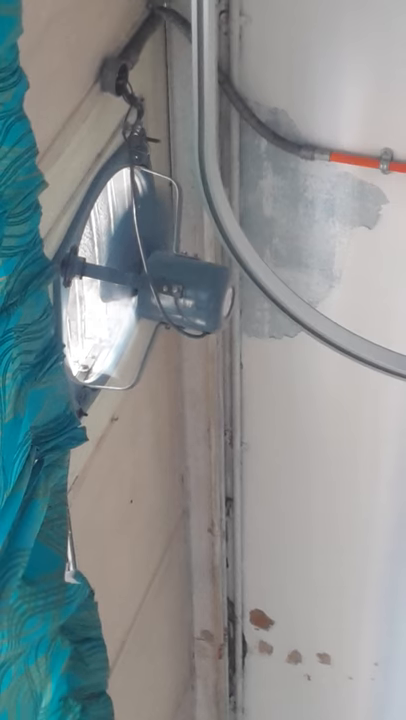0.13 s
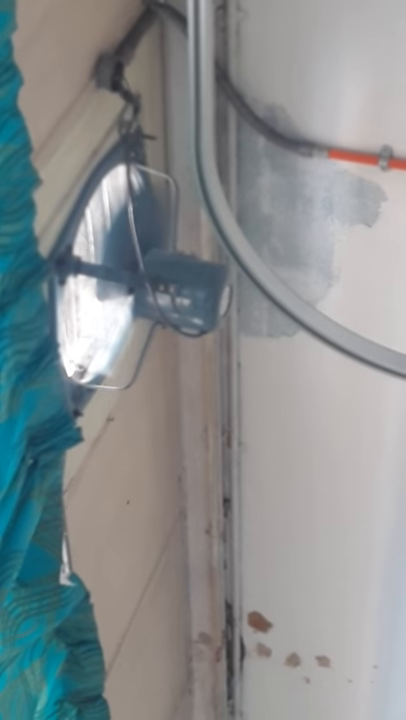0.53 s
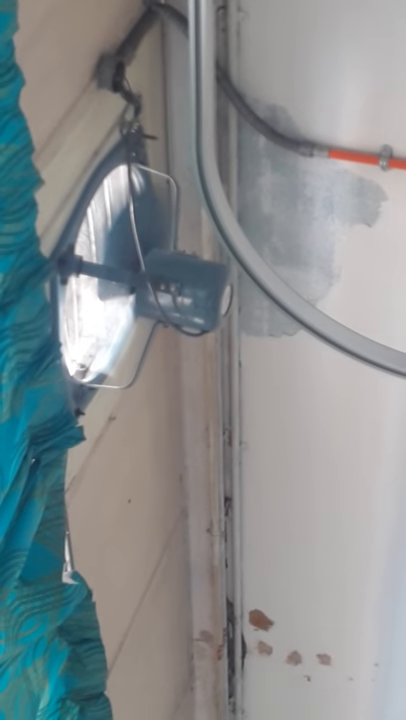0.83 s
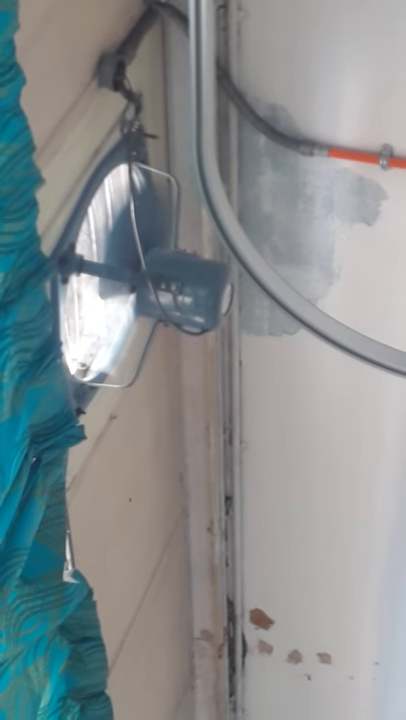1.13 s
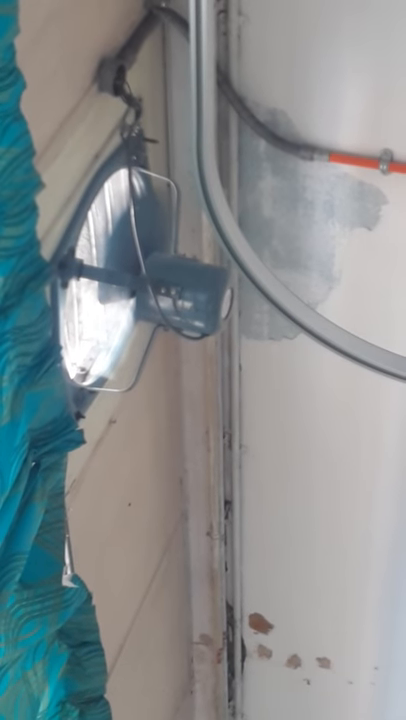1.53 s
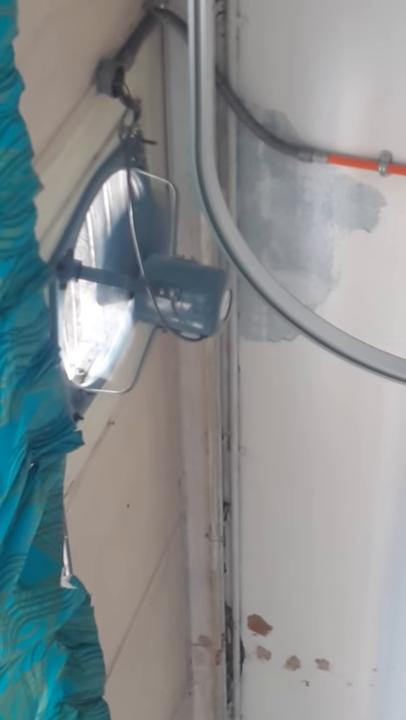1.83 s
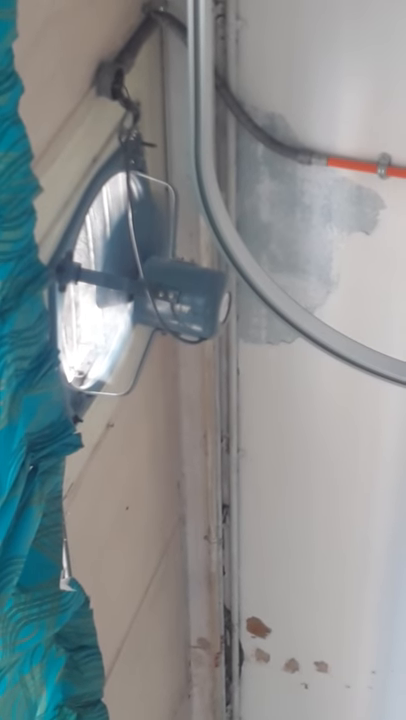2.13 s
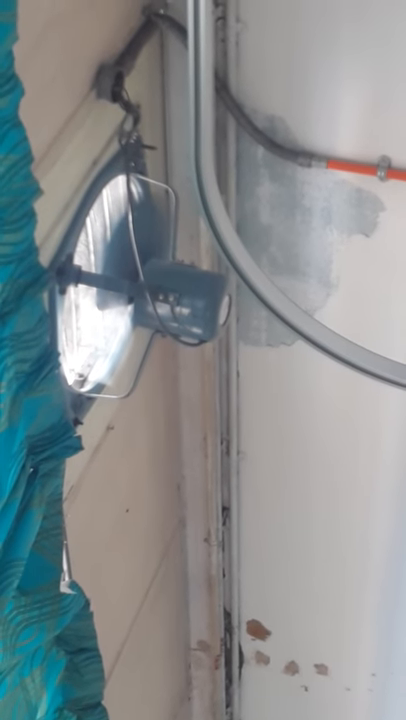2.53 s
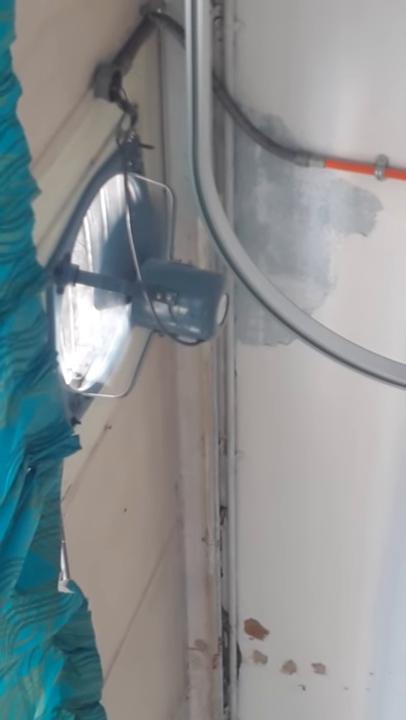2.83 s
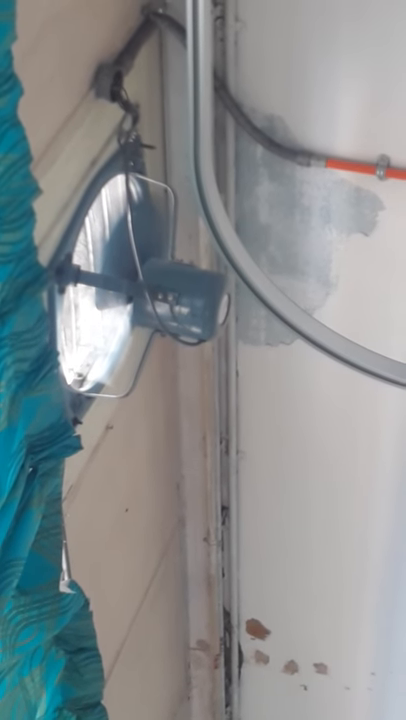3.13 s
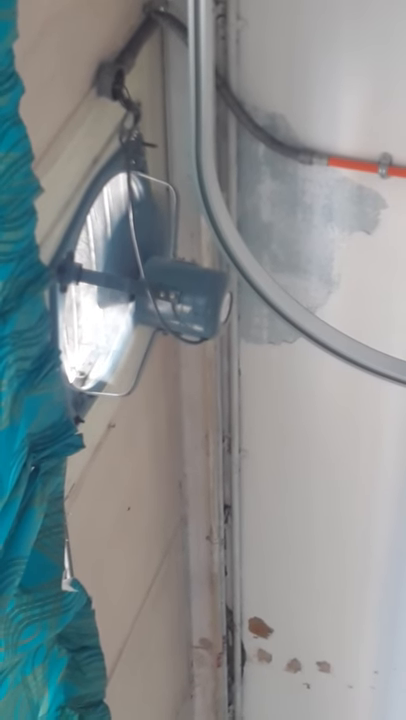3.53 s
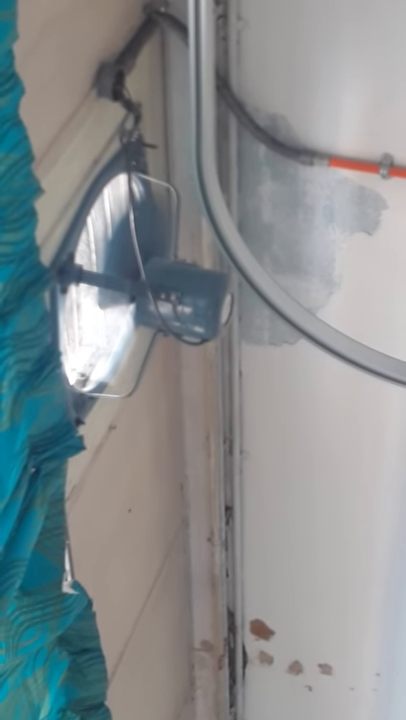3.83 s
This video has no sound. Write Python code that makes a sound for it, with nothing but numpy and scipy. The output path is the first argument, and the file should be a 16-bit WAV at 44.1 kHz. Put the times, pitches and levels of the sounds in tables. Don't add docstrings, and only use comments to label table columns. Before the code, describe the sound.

An exhaust fan runs steadily in a small hard room, its loose part rattling about twenty-four times a second over rushing air and hum; it fades in, and one knock hits the microphone just after two seconds.

```python
import sys
import numpy as np
from scipy import signal
from scipy.fft import rfft, irfft
from scipy.io import wavfile

SR = 44100
rng = np.random.default_rng(int(sys.argv[2]) if len(sys.argv) > 2 else 0)


def int16_out(signal):
    q = np.round(np.clip(np.atleast_2d(signal).T, -1, 1) * 32767)
    wavfile.write(sys.argv[1], SR, q.astype(np.int16))


def attenuation_scalar(level_db):
    decades = np.asarray(level_db, float) / 20
    return 10 ** decades


N = 176400


def rms_one(x):
    return x / np.sqrt(np.mean(x ** 2) + 1e-20)


def in_time(rows):
    return np.interp(np.arange(N) / SR, *np.transpose(rows))


def at_hz(points, hz):
    table_hz, value = np.transpose(points)
    return np.interp(np.log(hz), np.log(table_hz), value)


def colour(x, points):
    return irfft(rfft(x) * attenuation_scalar(at_hz(points, np.fft.rfftfreq(N, 1 / SR) + 1)), N)


def drift(rate):
    r = np.exp(-80 * np.pi * rate / SR)
    noise = rng.standard_normal(N // 40 + 2002)
    slow = signal.lfilter([1], [1, -2 * r, r * r], noise)[2000:]
    return np.interp(np.arange(N) / 40, np.arange(len(slow)), rms_one(slow))


def bumps(rows, width_s):
    t = np.arange(N) / SR
    return sum(db * np.exp(-.5 * ((t - s) / width_s) ** 2) for s, db in rows)


def ring(clicks, hz, t60):
    r, w = attenuation_scalar(-60 / (t60 * SR)), 2 * np.pi * hz / SR
    return signal.lfilter([0, np.sin(w)], [1, -2 * r * np.cos(w), r * r], clicks + 1e-18)


# (time [s], speed [turns/s])
SPEED = [(0, 23.73), (2.5, 23.73), (2.8, 23.74), (4, 23.74)]
FIRST_STRIKE_S = .0345


def shaft_turns():
    speed = in_time(SPEED)
    return np.cumsum(speed) / SR - FIRST_STRIKE_S * speed[0]


# (time after contact [ms], left level [dB], right level [dB])
BOUNCES = [(0, 1, 2), (1.1, -1, -1), (1.55, -2, 1), (2.4, -3, -1), (3.2, -4, -2), (3.7, -2, -9),
           (4.5, -6, -5), (5.9, -4, -4), (6.3, -9, -3), (7.4, -9, -5), (7.9, -7, -5), (9.3, -8, -8),
           (11.5, -8, -10), (12.8, -10, -9)]
BOUNCE_T60_S = .005
SCATTER_DB, SCATTER_T60_S = -21, .07


def paths():
    size = SR // 8
    dying_db = -60 * np.arange(size) / SR
    out = attenuation_scalar(SCATTER_DB + dying_db / SCATTER_T60_S) * rng.standard_normal((2, size))
    for ms, *side_db in BOUNCES:
        burst = attenuation_scalar(dying_db[:200] / BOUNCE_T60_S) * rng.standard_normal((2, 200))
        burst /= np.sqrt(np.sum(burst ** 2, axis=1, keepdims=True))
        start = int(ms * SR / 1000)
        out[:, start:][:, :200] += attenuation_scalar(np.array(side_db))[:, None] * burst
    return out


# (frequency [Hz], level [dB])
STRIKE_EDGE = [(3000, 0), (4500, 8), (7000, 3), (9000, 3), (11900, 2), (12500, 3)]


def strike_contact(at, strike):
    train = np.zeros((1, N))
    train[0, at] = strike
    heard = signal.fftconvolve(train, paths(), axes=1)[:, :N]
    return colour(heard, STRIKE_EDGE)


# (time [s], level [dB])
RUBS = [
    (.568, 4.5),
    (.652, 5),
    (.864, 5.5),
    (.89, 7),
    (1.62, -4),
    (2.17, 0),
    (3.012, 4),
    (3.18, 3),
    (3.56, 1),
    (3.6, 3),
]
RUB_S = .007
FIZZ_DB, FIZZ_SHARED = -23.5, 0.3
FIZZ_PER_S, FIZZ_SIZE_DB = 9000, 1.8
FIZZ_SWELL_DB, SWELL_SPREAD_DB = 3.5, 1.5
SWELL_AFTER_TURN, SWELL_WIDTH_TURN = .66, .05


def bearing_fizz(turn):
    mood_db = SWELL_SPREAD_DB * rng.standard_normal(200)[turn.astype(int)]
    bell = np.exp(-.5 * ((turn % 1 - SWELL_AFTER_TURN) / SWELL_WIDTH_TURN) ** 2)
    swell_db = bumps(RUBS, RUB_S) + (FIZZ_SWELL_DB + mood_db) * bell
    sizes = attenuation_scalar(FIZZ_SIZE_DB * np.minimum(rng.exponential(1, (3, N)), 5))
    sizes *= rng.choice([-1, 1], (3, N))
    grit = rms_one(sizes * (rng.random((3, N)) < FIZZ_PER_S / SR))
    level = attenuation_scalar(FIZZ_DB + swell_db + 0.098 * drift(60))
    return level * (grit[:2] + FIZZ_SHARED * grit[2])


GUARD_HZ = [6330, 6505, 7305, 7710, 8105, 8442, 9185, 9440, 9600, 9780, 9945, 10105, 11280, 11850]
# (level [dB], t60 [s], extra drive by the fizz [dB])
GUARD = [(-7.5, 0.13, 2.5), (-34.5, 0.21, 20.5), (-5.5, 0.045, 1), (-40, 0.017, 0), (7.5, 0.075, -8),
         (-3.5, 0.094, 5.5), (-22, 0.024, -4), (-23, 0.066, 4), (1.5, 0.078, -23), (-6, .05, -10),
         (-6, 0.086, 3), (7, 0.028, 5.5), (-10, 0.02, 12), (2, 0.035, -0.5)]
# (frequency [Hz], density [dB per Hz])
CRACK = [(1200, -21), (5000, -15.5), (6500, -4.5), (9500, 5.5), (10400, -7), (11900, -4.5), (12200, -13),
         (15500, -19.5)]
# (frequency [Hz], level [dB])
LEFT_STRIKE = [(7500, 0), (8800, -4), (11000, -5), (15500, -4)]
# (frequency [Hz], level [dB])
FIZZ_EDGE = [(6000, -1), (8000, -1), (10200, 0), (10700, 3), (11300, 0), (12000, 0), (12600, 6), (15500, 4)]
STRIKE_DB, STRIKE_SPREAD_DB, STRIKE_JITTER_S = 2.5, .7, .00006
MODES_DB, MODE_SPREAD_DB, MODE_LAG_S = -29, 2.5, .0018
FIZZ_MODES_DB = -9.5


def guard(turn):
    at = np.flatnonzero(np.diff(np.floor(turn)) > 0)
    luck = rng.standard_normal((len(at), len(GUARD) + 2))
    at = at + (luck[:, 0] * STRIKE_JITTER_S * SR).astype(int)
    strike = attenuation_scalar(STRIKE_DB + STRIKE_SPREAD_DB * luck[:, 1])
    fizz = bearing_fizz(turn)
    left, right = strike_contact(at, strike)
    metal = colour([colour(left, LEFT_STRIKE), right] + colour(fizz, FIZZ_EDGE), CRACK)
    lags = (rng.random((len(GUARD), 2)) * MODE_LAG_S * SR).astype(int)
    for k, (hz, (level_db, t60, fizz_db)) in enumerate(zip(GUARD_HZ, GUARD)):
        drive = attenuation_scalar(FIZZ_MODES_DB + fizz_db) * fizz
        for side in range(2):
            hit_db = MODE_SPREAD_DB * luck[:, k + 2] + (2 - side) * at_hz(LEFT_STRIKE, hz)
            drive[side, np.minimum(at + lags[k, side], N - 1)] += strike * attenuation_scalar(hit_db)
        metal += attenuation_scalar(MODES_DB + level_db) * ring(drive, hz, t60)
    return metal


# (multiple of shaft speed, left level [dB], right level [dB])
SHAFT = [(3, -63, -62), (4, -54, -54), (5, -51, -49), (6, -44, -41), (7, -44, -40), (8, -42, -42),
         (9, -44, -43), (10, -56, -59), (11, -53, -53), (12, -51, -44), (13, -57, -53), (14, -56, -50),
         (16, -56, -53), (20, -46, -47), (21, -47, -60), (22, -54, -53), (23, -55, -66), (25, -55, -59)]
# (shaft speeds above the hum, left level [dB], right level [dB])
HUM = [(0, -49, -41), (1, -48, -49), (2, -46.5, -43), (3, -82, -110), (4, -53.5, -44), (5, -48, -46.5),
       (6, -49, -45.5), (7, -52, -43.5), (10, -74, -65), (18, -56, -45)]
HUM_HZ, LINE_WANDER_DB = 100.1, 1.5
BLADE_LAG_TURN, PHASE_SCATTER = 0.198, 1.65


def motor(turn):
    out = np.zeros((2, N))
    mains = HUM_HZ * np.arange(N) / SR
    for rows, base in ((SHAFT, 0 * mains), (HUM, mains)):
        for k, *side_db in rows:
            phase = 2 * np.pi * (base + round(k) * (turn - BLADE_LAG_TURN))
            phase = phase + PHASE_SCATTER * rng.standard_normal() + 0.22 * drift(1.8)
            line = np.sqrt(2) * attenuation_scalar(LINE_WANDER_DB * drift(5.2)) * np.cos(phase)
            out += attenuation_scalar(np.array(side_db))[:, None] * line
    return out


# (frequency [Hz], density [dB per Hz])
AIR = [(30, -20), (80, -12.5), (130, -8.5), (280, -3), (420, -9), (1250, -12), (1600, -14), (5000, -14),
       (15500, -19.5)]
# (frequency [Hz], correlation)
LIKENESS = [(60, .98), (130, .95), (290, .82), (640, .5), (1400, .12), (15000, .05)]
# (time [s], level [dB])
GUSTS = [
    (.98, 4.6),
    (1.15, 1.3),
    (1.36, 2.2),
    (1.56, 3.3),
    (1.73, 1.5),
    (2.93, 3.6),
    (3.46, 2.3),
]
AIR_DB, AIR_SMOOTH_HZ = -27.5, 2000
GUST_S, GUST_TOP_HZ = 0.015, 1500


def rush(patchy_db, gust_db):
    out, together = 0, drift(2.5)
    edges = 25 * 2 ** np.arange(0, 9.6, .5)
    white = rng.standard_normal((2, 2, N))
    for k, (low, high) in enumerate(zip(edges, edges[1:])):
        band = signal.butter(2, [low, high], "band", fs=SR, output="sos")
        mid, side = signal.sosfilt(band, white[k % 2])
        hz = np.sqrt(low * high)
        alike = np.clip(at_hz(LIKENESS, hz), 0, 1)
        flicker_db = patchy_db * (0.19 * together + drift(10.4)) / (1 + hz / AIR_SMOOTH_HZ)
        gain = attenuation_scalar(at_hz(AIR, hz) + flicker_db + gust_db * (300 < hz < GUST_TOP_HZ))
        out = out + gain * (np.sqrt(1 + alike) * mid + np.sqrt(1 - alike) * side * [[1], [-1]])
    return attenuation_scalar(AIR_DB) * rms_one(out)


# (frequency [Hz], width [Hz], level [dB])
DUCT = [(502, 75, -46), (762, 113, -42.5), (1023, 140, -43.5), (1321, 38, -45)]
# (time [s], level [dB])
HOOTS = [
    (1.36, 5.5),
    (1.78, 12),
    (1.94, 16.7),
    (2.15, 14.8),
    (2.75, 5.2),
    (2.95, 3.4),
]
HOOT_S = 0.013


def duct(gust_db):
    out = np.zeros((2, N))
    for hz, width_hz, level_db in DUCT:
        tone = rms_one(ring(rng.standard_normal((2, N)), hz, 2.23 / width_hz))
        lift_db = bumps(HOOTS, HOOT_S) if hz == DUCT[-1][0] else gust_db
        gain = attenuation_scalar(level_db + 2.55 * drift(14.6) + lift_db)
        out += gain * (tone[0] + .5 * tone[1] * [[1], [-1]])
    return out


def air(patchy_db):
    gust_db = bumps(GUSTS, GUST_S)
    return rush(patchy_db, gust_db) + duct(gust_db)


# (frequency [Hz], level [dB], t60 [s])
SHELL = [(3100, -26, .012), (4070, -23, .015), (6100, -26, .01), (8300, -23, .012)]
KNOCK_S, KNOCK_DB = 2.20024, -1
PORT_HZ, PORT_TOP_HZ = 205, 7000


def knock():
    click = np.zeros(N)
    click[int(KNOCK_S * SR)] = attenuation_scalar(KNOCK_DB)
    vent = signal.butter(2, PORT_HZ, "high", fs=SR, output="sos")
    step = signal.sosfilt(vent, np.cumsum(click))
    step = signal.sosfilt(signal.butter(1, PORT_TOP_HZ, fs=SR, output="sos"), step)
    return step + sum(attenuation_scalar(db) * ring(click, hz, t60) for hz, db, t60 in SHELL)


# (time [s], level [dB])
GAIN = [(0, -2.5), (1.0, 0.5), (1.1, -0.5), (2.14, 0), (2.191, 0), (2.196, -8), (2.21, -8), (2.225, -2.5),
        (2.36, 0.5), (2.42, -2.5), (3.0, -3), (3.14, -0.63), (4, -0.5)]
FADE_START_S, FADE_END_S, FADE_FIRST = .3735, 0.64, 0.043
# (frequency [Hz], level [dB])
LEFT_SHADE = [(300, -2), (700, 0.5), (1400, -4), (4500, -1), (7700, 1.5), (8300, -5.5), (9200, -11.5),
              (15500, -11)]
LEFT_LAG_SAMPLES = -2


def scene():
    turn = shaft_turns()
    left, right = guard(turn) + air(patchy_db=3.0)
    left = np.roll(colour(left, LEFT_SHADE), LEFT_LAG_SAMPLES)
    fan = np.array([left, right]) + motor(turn)
    fade_s = [FADE_START_S - .002, FADE_START_S, FADE_END_S]
    fade = np.interp(np.arange(N) / SR, fade_s, [0, FADE_FIRST, 1])
    return fan * fade * attenuation_scalar(in_time(GAIN)) + knock() * [[1], [0]]


def low_pass(x):
    return signal.sosfilt(signal.butter(12, 15950, fs=SR, output="sos"), x)


def record(dry):
    cut = signal.sosfilt(signal.cheby2(16, 60, 15900, fs=SR, output="sos"), dry)
    cut = signal.sosfilt(signal.butter(2, 45, "high", fs=SR, output="sos"), cut)
    return low_pass(cut)


dry = scene()
out = record(dry)
int16_out(out)
```